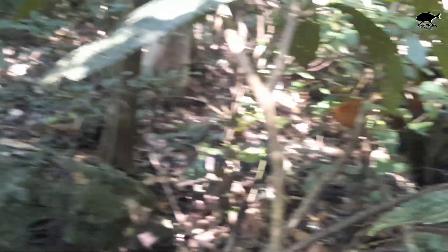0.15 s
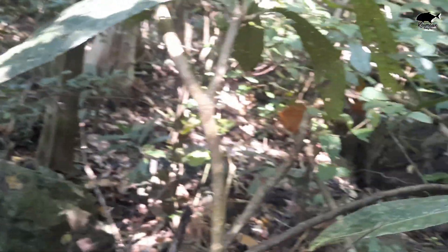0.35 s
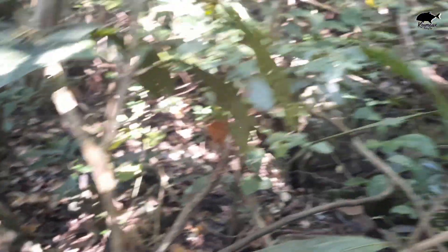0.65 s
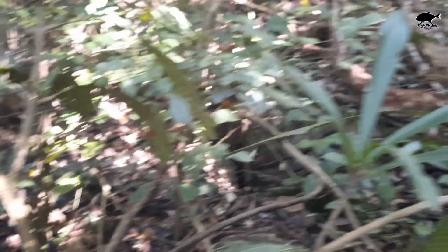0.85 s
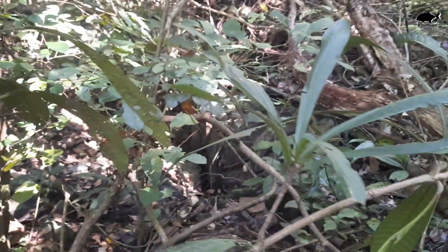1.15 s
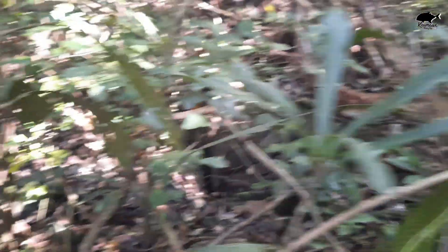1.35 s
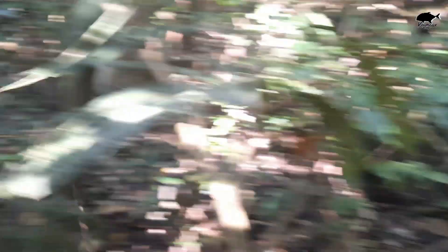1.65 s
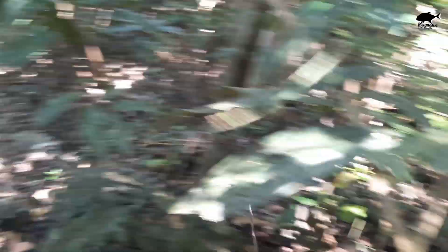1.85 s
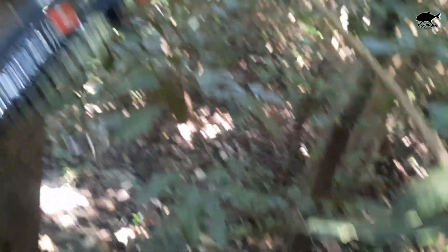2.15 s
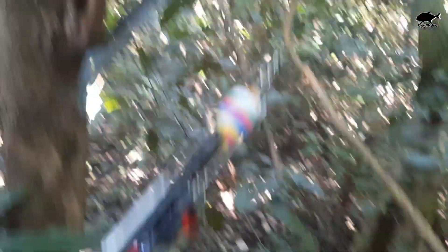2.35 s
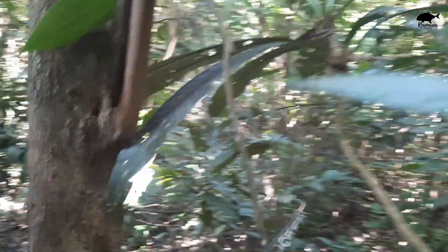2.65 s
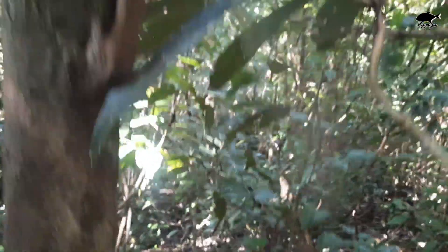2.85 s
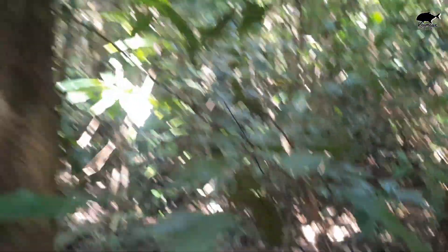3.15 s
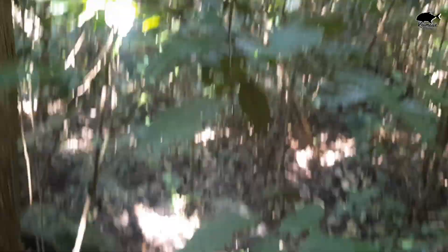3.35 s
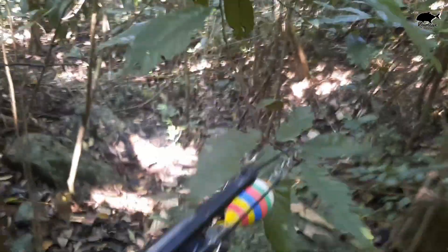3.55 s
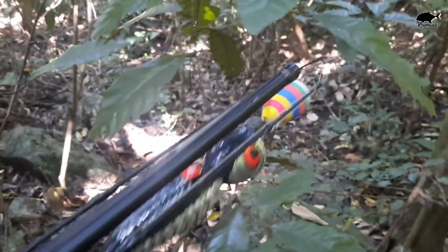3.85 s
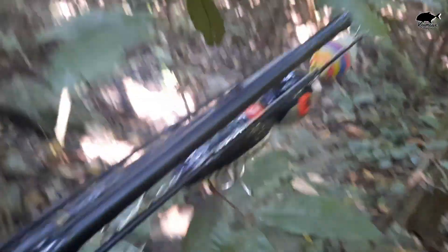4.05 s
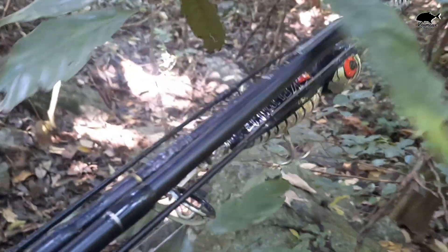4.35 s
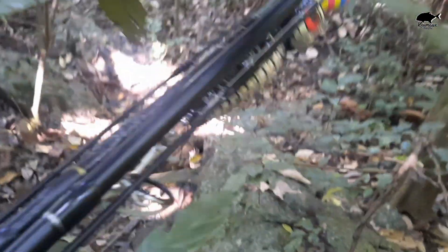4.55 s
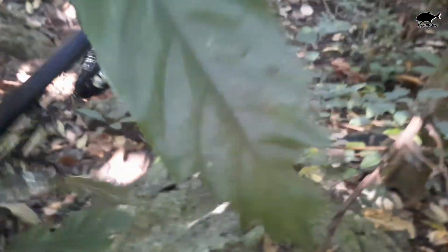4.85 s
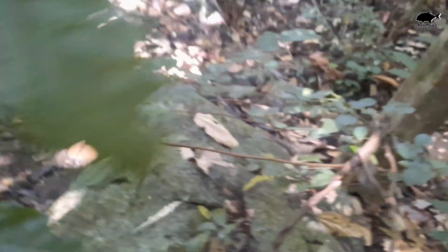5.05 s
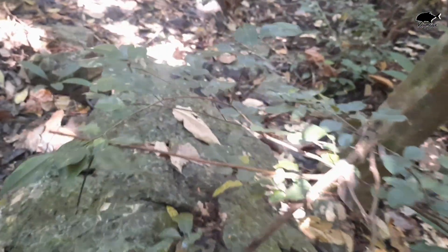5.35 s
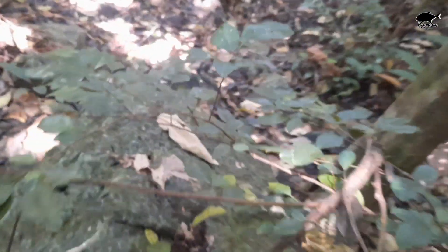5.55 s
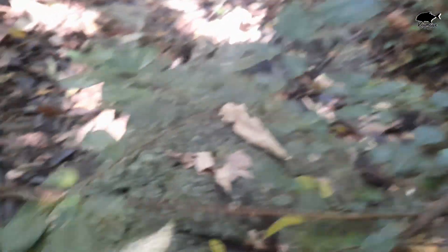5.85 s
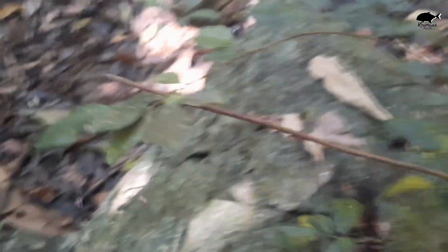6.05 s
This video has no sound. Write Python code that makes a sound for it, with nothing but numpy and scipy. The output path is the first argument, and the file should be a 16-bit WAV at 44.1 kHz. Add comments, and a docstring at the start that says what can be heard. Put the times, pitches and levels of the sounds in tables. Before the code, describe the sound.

Close, body-worn stereo microphone in a dry forest. Leaves rustle softly over faint insect hiss and low wind. Hard, woody twig cracks snap out, building to a dense burst of breaking and thudding. Calmer rustles and light ticks follow, then thick leaf rustling returns with branches dragging hollowly over the microphone housing, more snaps and bumps, and a brief metal clink at the end.

```python
"""Someone pushes through dry undergrowth with a small two-port microphone at the chest.
Far insects (a band of hiss) and low wind (bass noise) run throughout; at first the leaves rustle softly.
Sharp cracks (ticks with noise tails) and twig knocks (ringing wood) come near 0.9 and 1.3 s, most thickly near
1.6 s. Calmer steps (bass thumps) follow, then from 4.5 s thicker rustling (flickering bands of noise), branches
dragging over the housing (ringing noise) and more breaks; near 6.1 s a carried metal part clinks (ringing tones)."""
import sys
import numpy as np
from scipy import signal
from scipy.io import wavfile
from scipy.ndimage import map_coordinates

SR = 44100
rng = np.random.default_rng(int(sys.argv[2]) if len(sys.argv) > 2 else 0)


def output_pcm(signal):
    """Save a mono or channel-first signal as 16-bit PCM at the path in sys.argv[1].

    Samples are clipped to [-1, 1] before scaling.
    """
    pcm = np.clip(np.atleast_2d(signal).T, -1, 1) * 32767
    wavfile.write(sys.argv[1], SR, np.round(pcm).astype(np.int16))


N = 272979  # length in samples

HOUSING_HZ = 314  # the microphone housing rings here
TOP_LEFT_DB = 5  # the left port is less shaded in the top treble


def from_db(db):
    """Turn decibels into gain."""
    return 10 ** (np.asarray(db) / 20)


def rms_one(x):
    """Scale to rms (average strength) 1."""
    return x / np.sqrt(np.mean(x ** 2) + 1e-20)


def peak_one(x):
    """Scale to peak 1."""
    return x / np.abs(x).max()


def at_hz(points, hz):
    """Read a table between its points, with frequency on a log axis."""
    table_hz, values = np.array(points).T
    return np.interp(np.log(hz), np.log(table_hz), values)


def sides(pan_db):
    """Left and right gains for a left-minus-right difference in dB."""
    return from_db(np.array([[.5], [-.5]]) * pan_db)


def lag_of(pan_db):
    """Samples by which sound reaches the right port later; sound from far right reaches it first."""
    return 9.7 + 1.5 * np.clip(pan_db + 1.5, -7, 0)


def add(out, s, sound, pan_db):
    """Mix a short stereo sound in at time s, from its side."""
    starts = [int(s * SR), int(s * SR + lag_of(pan_db))]
    for channel, i in enumerate(starts):
        out[channel, i:i + sound.shape[1]] += sides(pan_db)[channel] * sound[channel, :N - i]


def drift(rate_hz):
    """Slow random wander with spread 1: smoothed noise, made at every 40th sample."""
    r = np.exp(-2 * np.pi * rate_hz * 40 / SR)
    noise = rng.standard_normal(N // 40 + 2002)
    slow = signal.lfilter([1], [1, -2 * r, r * r], noise)[2000:]  # drop the start-up
    return np.interp(np.arange(N) / 40, np.arange(len(slow)), rms_one(slow))


def resonance(x, hz, width_hz):
    """Ring at one pitch, with gain about 1 there; a narrower width rings longer."""
    r = np.exp(-np.pi * width_hz / SR)
    feedback = [1, -2 * r * np.cos(2 * np.pi * hz / SR), r * r]
    return signal.lfilter((1 - r * r) / 2 * np.array([1, 0, -1]), feedback, x)


def stereo(mid, side, alike):
    """Blend two noises so that the ports share more of the sound as alike goes from 0 to 1."""
    alike = np.clip(alike, 0, 1)
    return np.sqrt(1 + alike) * mid + np.sqrt(1 - alike) * side * [[1], [-1]]


def burst(t60, alike, size=6000):
    """Stereo noise that starts at once and falls 60 dB in t60 seconds, or 0.004 s if that is longer."""
    mid, side = rng.standard_normal((2, size))
    fade = from_db(-60 * np.arange(size) / SR / max(t60, .004))
    return stereo(mid, side, alike) * fade


def crackle(per_s, spread_db, t60):
    """Loudness of a rustle: a steady part plus tiny breaks that start sharply and die away."""
    born = rng.random(N) < per_s * from_db(5 * drift(8)) / SR
    sizes = from_db(spread_db * np.minimum(rng.exponential(1, N), 2.5))
    return 1 + signal.lfilter([1], [1, -from_db(-60 / (t60 * SR))], born * sizes)


def rustle(spectrum, patchy_db, grain):
    """Third-octave bands of stereo noise under one grain envelope, each band flickering a little; rms 1."""
    # how much of the sound the ports share: (frequency [Hz], likeness [0 to 1])
    likeness = [(40, 0.59), (150, 0.52), (400, 0.79), (1000, 0.14), (2500, 0.043), (6000, 0.034),
                (15000, 0.043)]
    hz = np.array(spectrum)[:, 0]
    edges = hz[0] * 2 ** np.arange(0, np.log2(hz[-1] / hz[0]) + .3, 1 / 3)
    white = rng.standard_normal((2, 2, N)) * grain
    out = 0
    for k, (low, high) in enumerate(zip(edges, edges[1:])):
        band = signal.butter(2, [low, min(high, .45 * SR)], "band", fs=SR, output="sos")
        mid, side = signal.sosfilt(band, white[k % 2])  # neighbouring bands use different noise
        centre = np.sqrt(low * high)
        gain = from_db(at_hz(spectrum, centre) + patchy_db * drift(5.8))
        out = out + gain * stereo(mid, side, at_hz(likeness, centre))
    return rms_one(out)


def body_push():
    """Push on leaves, stems and housing in dB, each sweep a bell-shaped swell on the walk; then treble and side."""
    # the walk: (time [s], push on leaves [dB], on stems [dB], on housing [dB],
    # top treble over the leaves [dB], left minus right [dB])
    walk = [(0.0, -78, -60.5, -56, -7, 3.5), (0.34, -61.5, -62, -60, -4.5, -2.0),
            (0.81, -67.5, -62.5, -53.5, -7.5, 0.5), (0.98, -69, -61, -50.5, -7, 0.5),
            (1.22, -64.5, -55, -57.5, -1.5, 1.5), (1.38, -52, -58, -53.5, -5, 2.5),
            (1.62, -48, -46, -46.5, -4.5, 3.5), (1.84, -55, -54.5, -55.5, -4, 2),
            (2.15, -70, -64, -59, -11, 1), (2.31, -58.5, -65, -57, -4.5, -1.5),
            (2.52, -68.5, -57, -58.5, -2, 1.5), (3.07, -57, -55.5, -55.5, -6.5, -1.5),
            (3.5, -56.5, -58.5, -55.5, -8, -3), (3.71, -59.5, -55, -53, -6, -1.5),
            (3.84, -56.5, -53, -50, -8, 0), (4.1, -60, -55.5, -58.5, -10.5, -0.5),
            (4.52, -53, -53.5, -53.5, -10, 2.0), (4.71, -41.5, -45, -44, -6.5, -0.5),
            (4.9, -58, -58, -49, -8, 1.5), (5.07, -44, -53, -53.5, -5, 0.5),
            (5.36, -53.5, -47.5, -49.5, -7, 0), (5.79, -52.5, -46.5, -52.5, -6, 2),
            (6.02, -50, -51, -47, -5, 0), (6.19, -49.5, -49.5, -48.5, -12, -0.5)]
    # a branch sweeps past: (time of peak [s], length scale [s], leaves [dB], stems [dB], housing [dB])
    sweeps = [(0.01, 0.13, -58.5, -57, -52.5), (0.184, .06, -58.5, -64, -77), (0.54, 0.053, -67, -74, -51),
              (0.907, 0.24, -56.5, -47.5, -54.5), (1.27, 0.11, -51, -46, -48.5),
              (1.546, 0.039, -53, -62, -59), (1.641, 0.13, -39, -35, -40.5), (1.98, 0.053, -63, -67, -56),
              (2.125, 0.24, -54.5, -58.5, -51.5), (2.616, 0.091, -77, -56.5, -50),
              (2.904, 0.14, -52, -67, -60), (3.04, 0.039, -66, -58, -60), (3.213, 0.096, -78, -72, -49.5),
              (3.305, 0.044, -55.5, -57, -68), (3.53, 0.033, -61, -66, -62),
              (3.653, 0.063, -71.5, -62, -47), (3.824, 0.08, -53.5, -46, -40.5),
              (4.13, 0.097, -55, -49.5, -57), (4.272, 0.057, -53, -47, -48.5),
              (4.537, 0.056, -45, -35.5, -41.5), (4.584, 0.1, -37, -46, -38), (4.737, 0.04, -68, -39, -49),
              (4.917, 0.26, -37, -42, -43), (5.0, 0.12, -48, -54, -51), (5.222, 0.17, -46, -67, -69),
              (5.447, 0.061, -56, -51, -53), (5.573, 0.12, -45.5, -40, -55),
              (5.771, 0.11, -42.5, -43.5, -50), (5.892, 0.19, -46.5, -47, -45),
              (6.062, 0.065, -46, -43, -43)]
    t = np.arange(0, N, 16) / SR  # every 16th sample is fine enough
    s, *columns = np.transpose(walk)
    *walk_db, top_db, pan_db = [np.interp(t, s, c) for c in columns]
    power = from_db(walk_db) ** 2
    for peak_s, length_s, *db in sweeps:
        bell = np.exp(-(np.e * (t - peak_s) / length_s) ** 2)
        power += from_db(db)[:, None] ** 2 * bell
    curves = (*(10 * np.log10(power)), top_db, pan_db)
    return [np.interp(np.arange(N) / SR, t, c) for c in curves]


def insects():
    """Far insects blend into a steady hiss: noise through two equal resonances."""
    hz, width_hz, level_db = 8100, 1600, -60.5
    far = rng.standard_normal((2, N))
    song = resonance(resonance(far, hz, width_hz), hz, width_hz)
    return from_db(level_db) * rms_one(song)


def low_rumble(housing_db):
    """Bass noise that follows the push on the housing, over a low wind that never stops."""
    # colour of the rumble: (frequency [Hz], relative level per Hz [dB])
    colour = [(25, -47), (45, -10.5), (70, -2), (110, -6.5), (160, -3.5), (230, -15), (400, -11)]
    wind_db = -73.5
    rub_db = housing_db - 7.5 + 1.5 * drift(5.9)  # random swing of what rubs
    return np.hypot(from_db(rub_db), from_db(wind_db)) * rustle(colour, 0.87, 1)


def thumps():
    """Footfalls and bumps through the body: a soft push swells for a moment and rings a few cycles in the bass."""
    # (time [s], peak [dB], pitch [Hz], time to fall 60 dB [s])
    bumps = [(.01, -54.5, 76, .25), (1.39, -40.5, 136, 0.058), (1.421, -45.5, 150, 0.095),
             (1.631, -28, 157.5, 0.21), (1.657, -34.5, 152, 0.26), (1.722, -34.5, 100, 0.085),
             (2.095, -52, 168.6, 0.22), (2.640, -51.5, 95.5, 0.23), (3.602, -43.5, 136, 0.071),
             (3.642, -39.5, 136, 0.048), (3.796, -41.5, 177, 0.18), (3.809, -55, 141, 0.14),
             (4.518, -36.5, 173, 0.18), (4.731, -39.5, 136, 0.074), (4.755, -39, 65.6, 0.19),
             (4.917, -34, 161, 0.14), (5.02, -36, 162, 0.086), (5.807, -45, 150, 0.068),
             (5.902, -38.5, 121, 0.093), (6.006, -37, 106, 0.045), (6.069, -49, 155, 0.11)]
    out, t = np.zeros((2, N)), np.arange(12000) / SR
    for s, peak_db, hz, t60 in bumps:
        swell = 1 - np.exp(-t / 0.0018)
        ring = swell * from_db(-60 * t / t60) * np.sin(2 * np.pi * hz * t)
        add(out, s, from_db(peak_db) * peak_one(ring) * np.ones((2, 1)), 0)
    return out


def housing_drag(housing_db, twig_grain):
    """Branches drag over the housing: rubbing noise, grainy like the twigs, makes it ring."""
    drag_db = housing_db - 1 + 1.5 * drift(2.5)  # random swing of what rubs
    rub = np.sqrt(twig_grain) * burst(1e6, alike=.8, size=N)  # t60 so long that the noise stays steady
    ring = resonance(resonance(rub, HOUSING_HZ, 103), HOUSING_HZ, 490)
    return from_db(drag_db) * rms_one(ring)


def metal_clinks():
    """Each touch rings the carried metal part's modes, each with a random strength at each port."""
    # touches: (time [s], strength [dB])
    touches = [(6.096, -29.5), (6.110, -38), (6.152, -28.5)]
    # ringing modes: (pitch [Hz], typical level before the touch strength [dB], time to fall 60 dB [s])
    modes = [(3490, -6.5, 0.14), (3430, -8, 0.051), (3780, -13, 0.078), (4050, -15, 0.093),
             (2580, -11, .04)]
    out, t = np.zeros((2, N)), np.arange(9000) / SR
    for s, strength_db in touches:
        ring = 0
        for hz, db, t60 in modes:
            mode_db = db - 60 * t / t60 + rng.normal(0, 2.3, (2, 1))
            ring = ring + from_db(mode_db) * np.sin(2 * np.pi * hz * t)
        add(out, s, from_db(strength_db) * ring, 2.5)
    return out


def wood_knocks():
    """A blow rings a twig for a few cycles, splinters follow; the housing booms along."""
    # (time [s], wood peak before panning [dB], wood pitch [Hz], housing peak before panning [dB],
    # left minus right [dB])
    blows = [(.038, -38.5, 580, -54, 0), (.155, -37, 886, -68, -.5), (0.795, -29, 1260, -46, 3),
             (.829, -36, 1440, -54, 4), (.852, -24, 1140, -38, 0), (.877, -8, 930, -40, 0.5),
             (0.885, -17.5, 1040, -25, 3), (.906, -14, 940, -51, 4), (.935, -19, 755, -62, 2),
             (1.001, -19.5, 1060, -51, 1), (1.086, -18.5, 580, -30.5, 2), (1.183, -24, 495, -25, 2.5),
             (1.269, -2, 887, -47, 4.5), (1.39, -30, 513, -28, -4), (1.42, -52, 452, -33.5, -2),
             (1.448, -32, 1430, -45, 7), (1.468, -33, 556, -35.5, -3), (1.597, -26, 655, -57, 4),
             (1.611, -23.5, 864, -47, -1), (1.623, -27, 810, -46, 3), (1.63, -12, 580, -25, 7),
             (1.636, -17, 435, -27, -5), (1.645, -17, 457, -24, 7), (1.661, -16, 900, -24, 2),
             (1.674, -32, 463, -22, 0), (1.71, -25, 820, -58, 6), (1.819, -26, 614, -44, 1),
             (1.908, -34, 1650, -67, -1), (2.073, -28, 630, -62, 5), (2.083, -28.5, 790, -33, 2),
             (2.108, -23, 670, -41, 2), (2.367, -48, 463, -27, 2), (2.484, -45, 875, -65, 0),
             (2.687, -40.5, 497, -46, -1), (2.88, -34, 647, -47, 1.5), (3.021, -18.5, 1030, -54, 1),
             (3.221, -31.5, 1650, -45, -4.5), (3.323, -34, 1420, -63, -5), (3.527, -44, 450, -33, -2),
             (3.604, -49, 452, -36, -13), (3.643, -44, 479, -45, -4), (3.996, -49, 580, -68, -2),
             (4.239, -43, 613, -66, 19), (4.411, -34.5, 1730, -65, 9), (4.446, -38, 460, -47, 1),
             (4.518, -11, 780, -28.5, 0), (4.534, -22, 455, -33, 1), (4.57, -15.5, 1280, -28.5, 6.5),
             (4.651, -27.5, 1180, -57, 5.5), (4.678, -26.5, 450, -44, 6.5), (4.792, -28, 730, -41, 5),
             (4.843, -32, 606, -50, 4), (4.903, -31, 510, -49, 12), (5.093, -34, 960, -38.5, -3.5),
             (5.111, -32, 527, -59, 2.5), (5.31, -31, 670, -41, 1), (5.366, -38, 573, -37.5, 1),
             (5.419, -39, 711, -51, 9), (5.584, -18, 597, -47, 2), (5.744, -35, 810, -37, 3),
             (5.811, -31, 727, -35, 1), (6.096, -50, 727, -34, 1), (6.123, -30, 1250, -45, -2.5),
             (6.148, -31, 1460, -38, -6)]
    splinter_db, splinter_t60, upper_mode_db = -3, 0.038, -6.5  # for blows up to -22.5 dB; t60 in s
    out = np.zeros((2, N))
    for s, peak_db, hz, housing_db, pan_db in blows:
        # a harder blow breaks cleaner: splinters sink and the upper mode rises
        clean_db = 0.3 * max(peak_db + 22.5, 0)
        blow = from_db(splinter_db - clean_db) * burst(splinter_t60, alike=0.82)
        blow[:, :12] += np.hanning(12) * 2  # the first contact
        lower = resonance(blow, hz, 0.41 * hz)  # two bending modes
        upper = from_db(upper_mode_db + clean_db) * resonance(blow, 2.08 * hz, 0.63 * hz)
        wood = signal.lfilter([.35], [1, -.65], lower - upper)  # wood swallows the treble
        boom = resonance(resonance(blow, HOUSING_HZ, 89), HOUSING_HZ, 270)
        knock = from_db(peak_db) * peak_one(wood) + from_db(housing_db) * peak_one(boom)
        add(out, s, knock, pan_db)
    return out


def twig_rustle(stems_db, twig_grain):
    """Pushed stems give lower, grainy noise that follows the push on them."""
    # colour of the twigs: (frequency [Hz], relative level per Hz [dB])
    colour = [(350, -10), (500, -1.5), (800, -3.5), (1300, -8.5), (2000, -16.5), (3000, -15.5)]
    return from_db(stems_db) * rustle(colour, 2.2, twig_grain)


def leaf_cracks():
    """A dry leaf or bark break is one sharp tick, then a broad noise tail with a colour of its own."""
    # (time [s], peak before panning [dB], centre [Hz], top treble before shading and panning [dB],
    # left minus right [dB], tail gain against the tick [dB])
    breaks = [(0.25, -45, 4120, -71, 8, -6), (0.2916, -40.5, 6040, -51, -1.5, -9),
              (0.3358, -38, 6300, -62, -1.5, -12), (.7931, -37, 2530, -64, 4, -8),
              (.852, -31, 2900, -55, 0, -23), (0.877, -9, 4270, -16.5, 2, -17),
              (0.907, -11.5, 3150, -39, 1.5, -12.5), (0.9327, -30.5, 3800, -35, 9, -7.5),
              (.964, -42, 3740, -62, .5, -15), (0.9992, -36, 3070, -63, -1, -2.5),
              (1.182, -31, 1900, -45, 5, -2), (1.241, -27.5, 7840, -28, -4.5, -15),
              (1.27, -9.5, 2400, -28, 7.5, -19), (1.499, -42, 4760, -35, 10, -19),
              (1.5563, -11.5, 6200, -4, 3, -6.5), (1.5655, -11.5, 7950, -9.5, 0, 11),
              (1.5943, -13.5, 5960, -9.5, 3, -3), (1.624, -20, 2320, -22, 0, 14),
              (1.6337, -14.5, 7400, -12, 5, -3), (1.6533, -15, 7450, -22, -1, -11),
              (1.665, -24, 7200, -20, 4, -2), (1.6764, -24, 5840, -24, 3, 14),
              (1.6957, -20.5, 2380, -24, 2, -9), (1.7053, -16, 7660, -12.5, 2, 4),
              (1.82, -32.5, 3220, -54, 5, -6), (1.8936, -43, 5980, -34, 3, -8),
              (1.9086, -43, 2940, -58, -1, -4), (1.958, -40, 3130, -55, 2.5, -3),
              (1.9778, -35, 7770, -55, -4, -8), (2.0824, -36.5, 2130, -35, 2, 15),
              (2.1099, -26.5, 7900, -32, 1, -5), (2.168, -37, 7740, -37, 8, 0),
              (2.2, -38, 2120, -44, 7, -4.5), (2.2383, -35.5, 8000, -37, 3, 7),
              (2.2726, -30.5, 4070, -57, -4.5, -9.5), (2.571, -42, 2160, -69, 2, -4),
              (2.6866, -34, 5360, -30.5, -2.5, 11), (2.8805, -22.5, 8200, -25, 4.5, -4.5),
              (3.02, -22, 2360, -56, 1, -2), (3.0887, -36, 2070, -62, -5, -10),
              (3.1449, -31, 2010, -31.5, -6, 15), (3.2177, -23.5, 1990, -47, -6, -13),
              (3.2748, -40.5, 4830, -38, 1, 9), (3.325, -21.5, 2440, -38, -5, -15.5),
              (3.3588, -32.5, 3520, -30, -5.5, -4), (3.4327, -37, 2040, -52, -5, 0),
              (3.5047, -37, 2540, -56, -8, 0), (3.6024, -22.5, 6750, -22.5, -7.5, -9),
              (3.6426, -34, 7140, -55, -5, -10), (3.6714, -25, 7240, -31, -6, -9),
              (3.7186, -32, 6760, -57, -3, 9), (3.7763, -31.5, 2450, -30.5, 2.5, 2),
              (3.807, -29, 4350, -56, -5.5, -6), (3.946, -33, 6600, -60, -3.5, -15),
              (3.9877, -40, 7600, -63, -7, -3), (4.0432, -31.5, 6370, -29.5, -10, -9),
              (4.0747, -33.5, 6030, -38, -4.5, 1), (4.212, -37, 6020, -66, -2, -2),
              (4.2364, -30.5, 2600, -57, -6, -7.5), (4.301, -26, 6950, -52, -1, 0),
              (4.4124, -40, 3290, -62, -5.5, 17), (4.511, -23.5, 7800, -46, -10, -10),
              (4.5179, -12, 2690, -13.5, 0, -7.5), (4.5705, -16, 6000, -19, 7, -14),
              (4.5892, -20, 2440, -40, -7, -14), (4.6517, -19.5, 3450, -13, -2.5, -1.5),
              (4.679, -16.5, 3000, -40, 5, -9.5), (4.7243, -22, 2310, -30, 1, -5),
              (4.79, -31, 2310, -48, -3, -1), (4.8249, -24.5, 2410, -45, -2.5, -25),
              (4.845, -24, 2420, -28, 3, -2), (4.9042, -20, 6200, -13, 1, -0.5),
              (5.2794, -32, 4930, -46, -2, -15), (5.4245, -37, 3850, -45, 12, -5),
              (5.546, -29.5, 2460, -47, 5, 0), (5.5609, -21.5, 2590, -37, 4.5, 7),
              (5.5818, -25, 2840, -25, 9, 2), (5.724, -30, 6130, -31, -2, -12),
              (5.739, -26, 3140, -45, -5, -4), (5.7506, -28, 3080, -38, 5, 10),
              (5.895, -26, 6930, -23, -2.5, -1), (6.0702, -16.5, 8400, -17, 2, -9),
              (6.097, -16, 3720, -17, -3.5, -5), (6.124, -24, 3490, -43, 2.5, -6),
              (6.1492, -19, 3490, -53, 0, -5)]
    out = np.zeros((2, N))
    band = signal.butter(2, [1500, 8800], "band", fs=SR, output="sos")
    top = signal.butter(3, 9800, "high", fs=SR, output="sos")
    swell = 1 - np.exp(-np.arange(3000) / SR / 0.00018)  # the tail builds up as the fibres part
    for s, peak_db, hz, top_db, pan_db, tail_db in breaks:
        t60 = 0.064 * from_db(0.44 * tail_db)  # a stronger tail lasts longer
        tick = burst(0.0059, alike=0.36, size=3000)
        tail = swell * burst(t60, alike=0.02, size=3000)
        noise = tick + from_db(tail_db) * tail
        body = signal.sosfilt(band, 0.39 * noise + resonance(noise, hz, 0.16 * hz))
        fizz = sides(TOP_LEFT_DB) * peak_one(signal.sosfilt(top, swell * noise))
        add(out, s, from_db(peak_db) * peak_one(body) + from_db(top_db) * fizz, pan_db)
    return out


def leaf_ticks(per_s, spread_db):
    """Tiny leaf edges snap at random, each ringing a few cycles at one of 12 pitches, each with its side; rms 1."""
    born = rng.random(N) < per_s * from_db(5 * drift(6)) / SR
    sizes = from_db(spread_db * np.minimum(rng.exponential(1, N), 3))
    snaps = born * sizes * rng.choice([-1, 1], N)
    dealt = rng.integers(0, 12, N)  # which pitch each snap gets
    out = 0
    for k, hz in enumerate(np.geomspace(1100, 8000, 12)):
        ring = resonance(snaps * (dealt == k) + 1e-18, hz, 0.2 * hz)
        out = out + sides(rng.normal(0, 11.8)) * ring / np.sqrt(hz)
    return rms_one(out)


def leaf_rustle(leaves_db, top_db):
    """Many dry leaves rub and break: grainy noise, top treble in the same grain, and ringing ticks."""
    # colour of the leaves: (frequency [Hz], relative level per Hz [dB])
    colour = [(1200, -14.5), (2000, -3.5), (3200, -8), (5000, -6), (7000, -3.5), (8600, -4.5),
              (10500, -22.5)]
    # colour of the top treble: (frequency [Hz], relative level per Hz [dB])
    top_colour = [(8000, -30), (9500, -38), (11000, -5), (13500, -9.5), (15500, -2)]
    leaf_db = leaves_db + 2.5 * drift(2.7) + 2.5  # random swing, then rustle over push
    grain = crackle(per_s=140, spread_db=1.0, t60=0.011)
    body = from_db(leaf_db) * rustle(colour, 1.4, grain)
    top = from_db(leaf_db + top_db) * sides(TOP_LEFT_DB) * rustle(top_colour, 0.64, grain)
    return body + top + from_db(leaf_db - 8) * leaf_ticks(per_s=300, spread_db=5.5)


def scene():
    """Background, rustle and breaks as they reach both ports."""
    leaves_db, stems_db, housing_db, top_db, pan_db = body_push()
    twig_grain = crackle(per_s=70, spread_db=4.0, t60=0.085)
    background = insects() + low_rumble(housing_db) + housing_drag(housing_db, twig_grain)
    plants = twig_rustle(stems_db, twig_grain) + leaf_rustle(leaves_db, top_db)
    bed = background + sides(pan_db) * plants
    # the right port hears the bed with a lag that follows its side
    bed[1] = map_coordinates(bed[1], [np.arange(N) - lag_of(pan_db)], order=3, mode="nearest")
    return bed + thumps() + metal_clinks() + wood_knocks() + leaf_cracks()


def record(dry):
    """The port cavity weakens a band by cancelling part of it, and the top is cut."""
    notch_hz, notch_width_hz, notch_depth = 9250, 2080, 0.69  # depth 1 would cancel the centre fully
    heard = dry - notch_depth * resonance(dry, notch_hz, notch_width_hz)
    top_cut = signal.cheby2(16, 70, 16250, fs=SR, output="sos")  # 70 dB down from 16250 Hz up
    return signal.sosfilt(top_cut, heard)


dry = scene()
out = record(dry)
output_pcm(out)
```